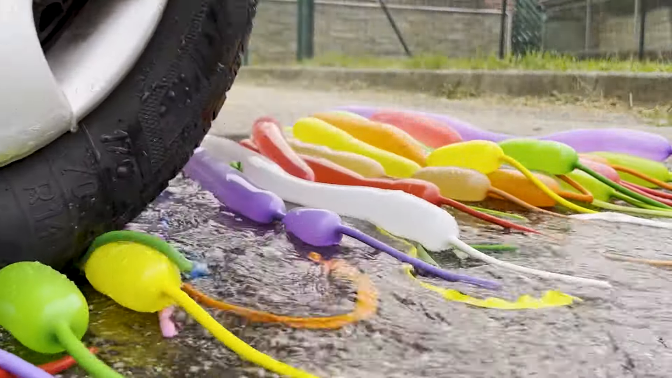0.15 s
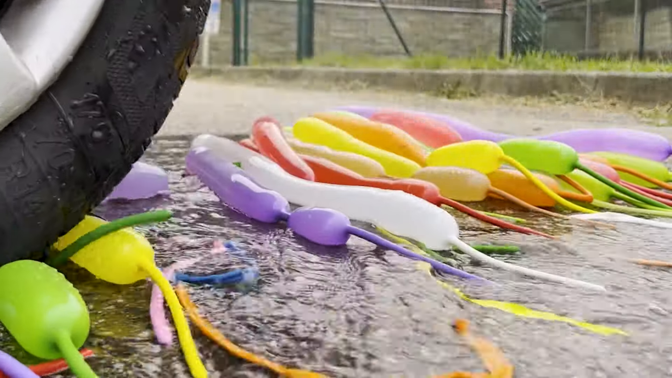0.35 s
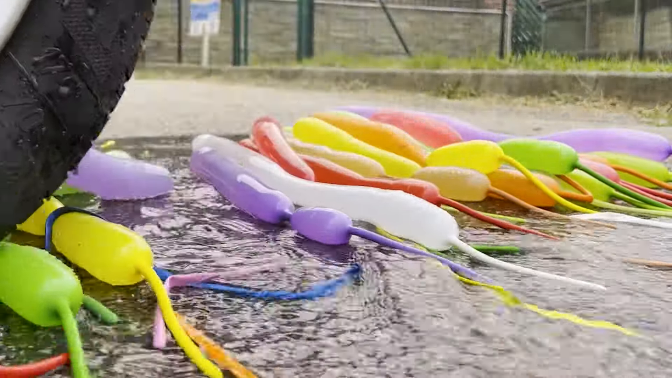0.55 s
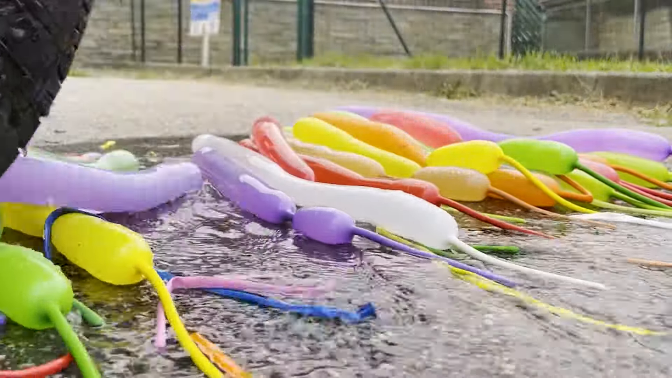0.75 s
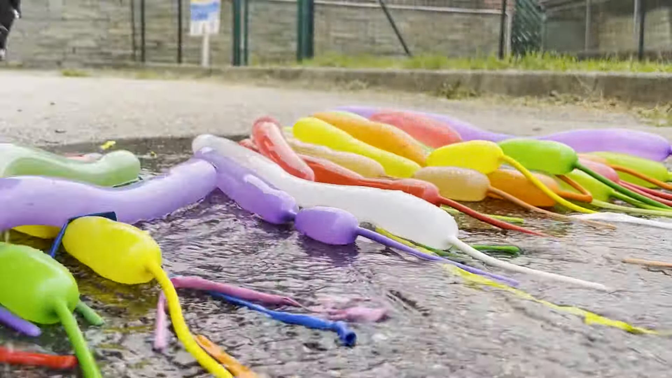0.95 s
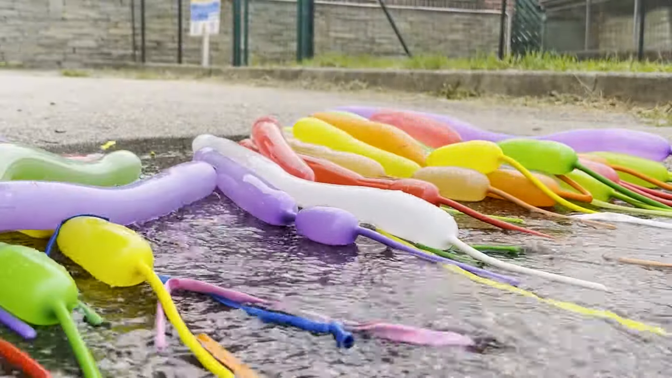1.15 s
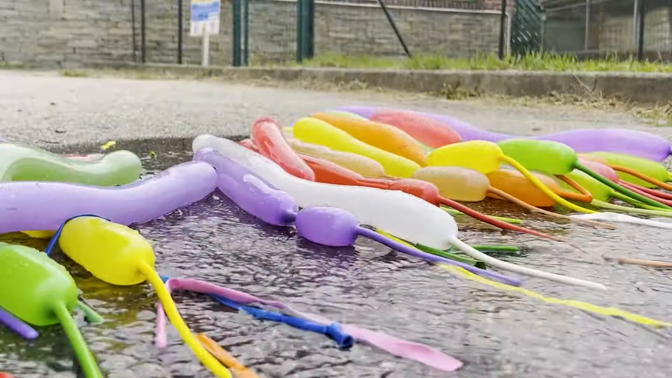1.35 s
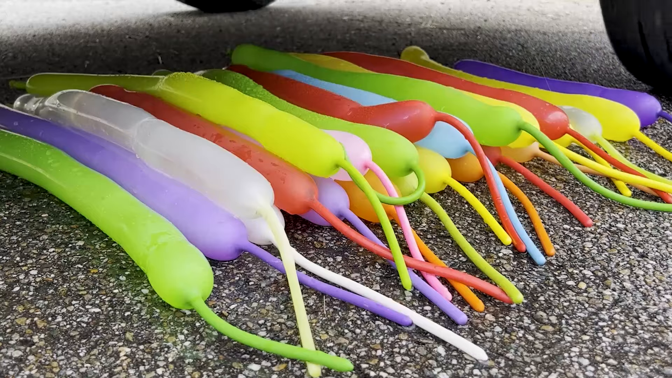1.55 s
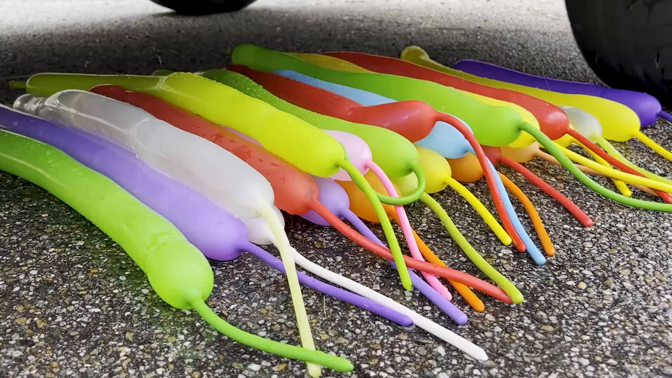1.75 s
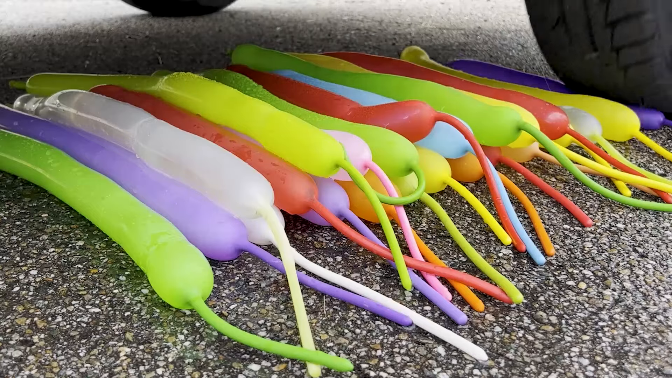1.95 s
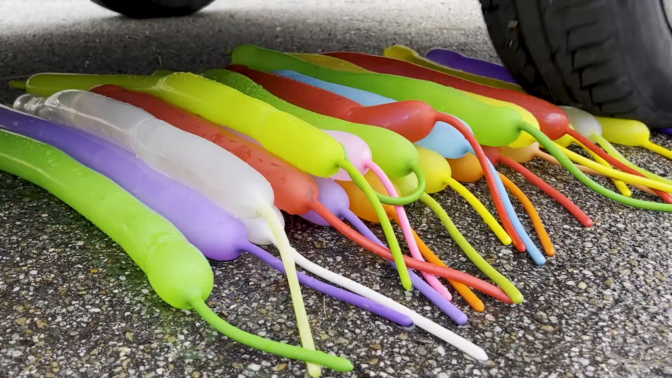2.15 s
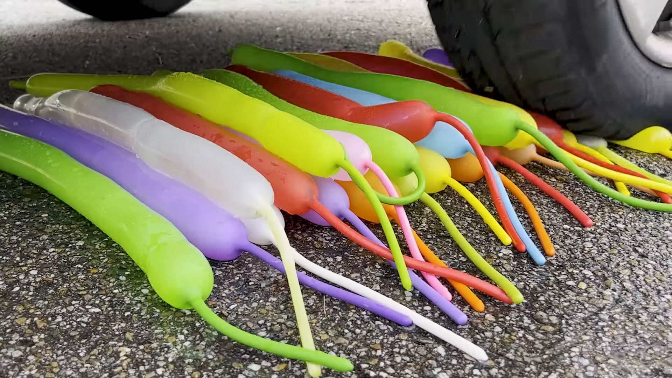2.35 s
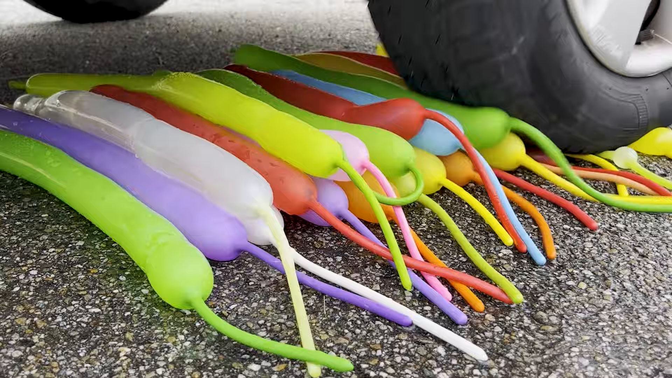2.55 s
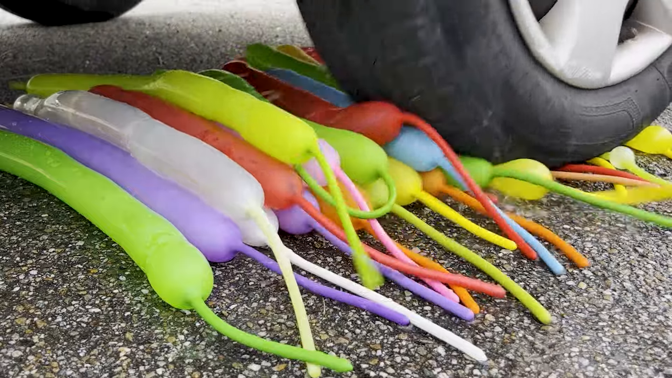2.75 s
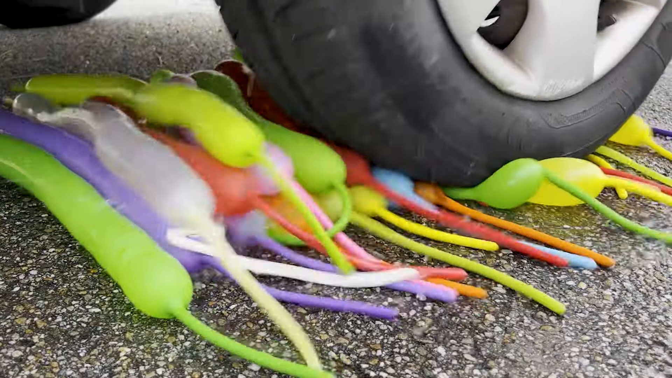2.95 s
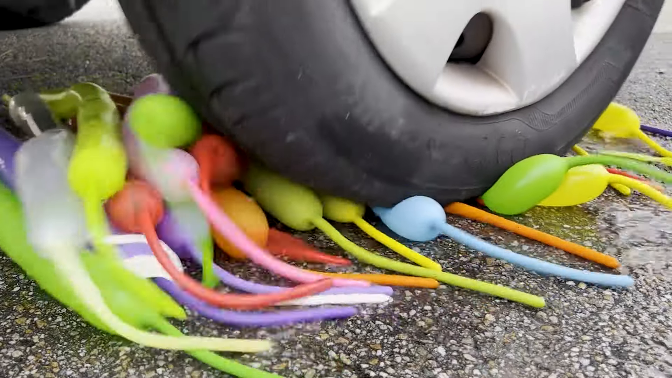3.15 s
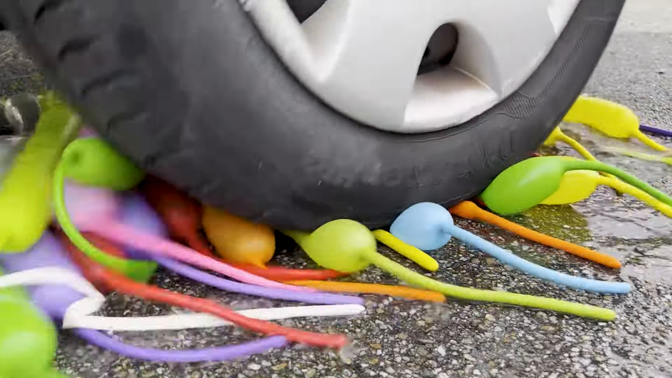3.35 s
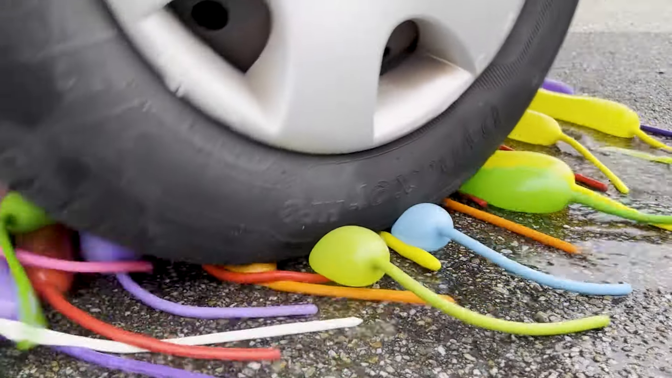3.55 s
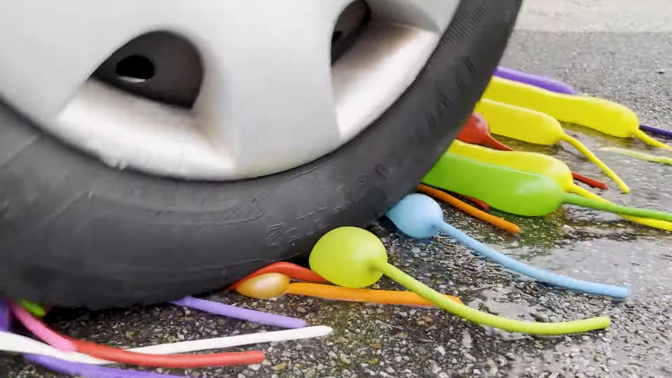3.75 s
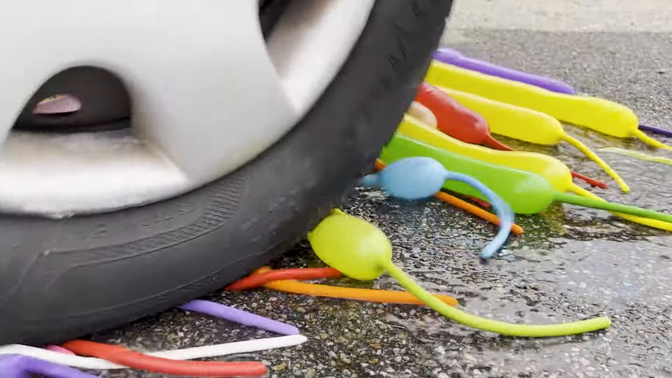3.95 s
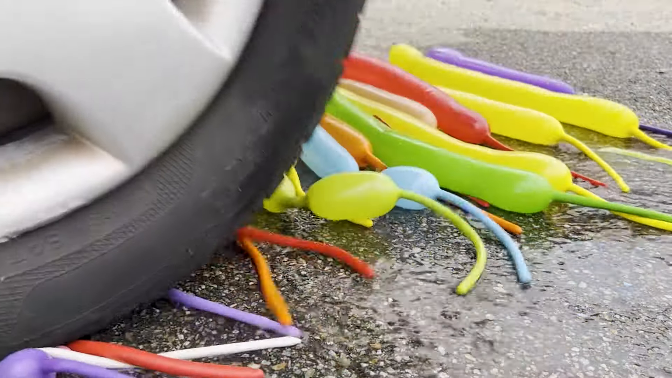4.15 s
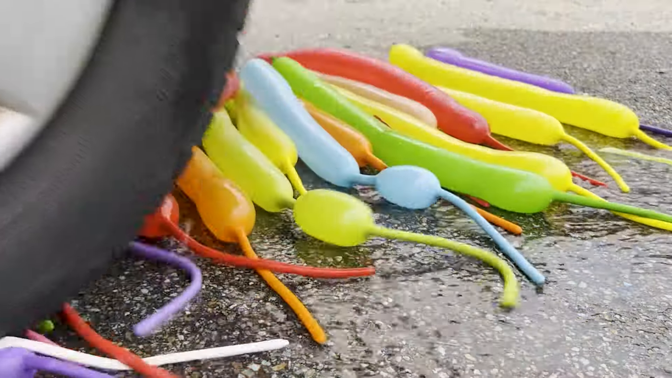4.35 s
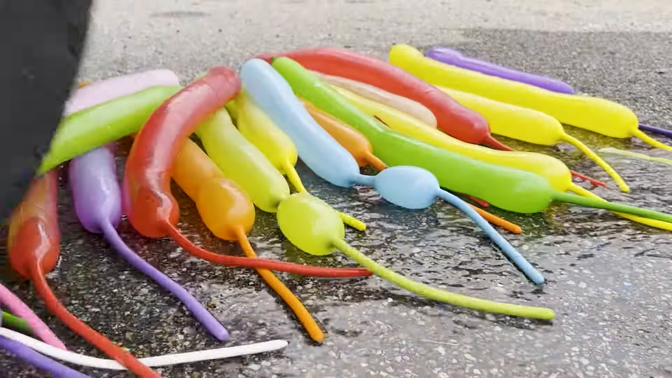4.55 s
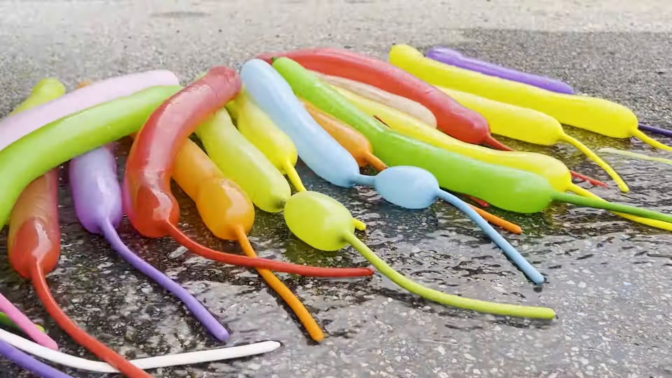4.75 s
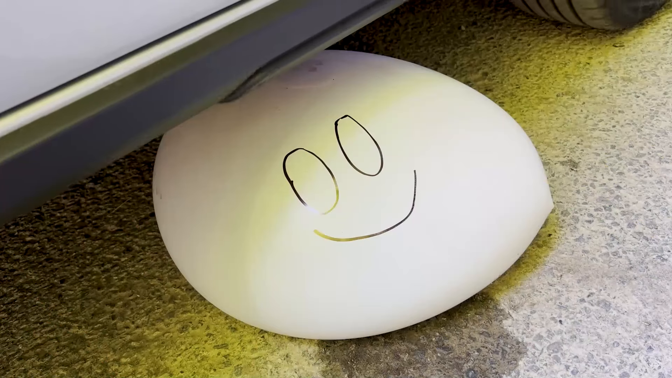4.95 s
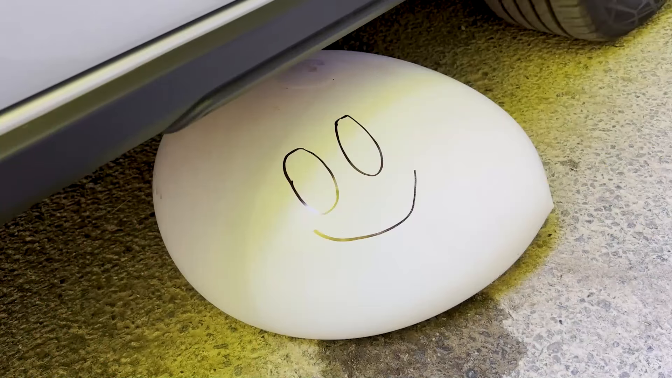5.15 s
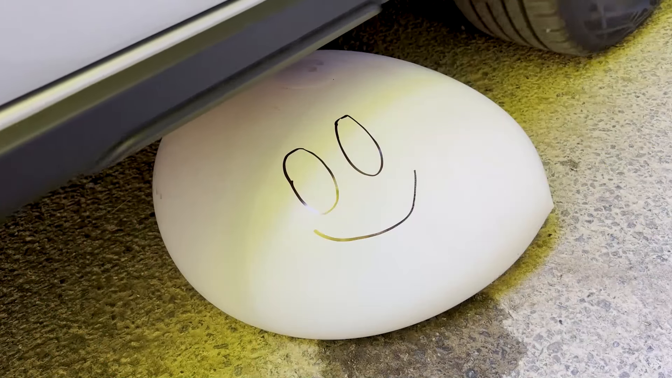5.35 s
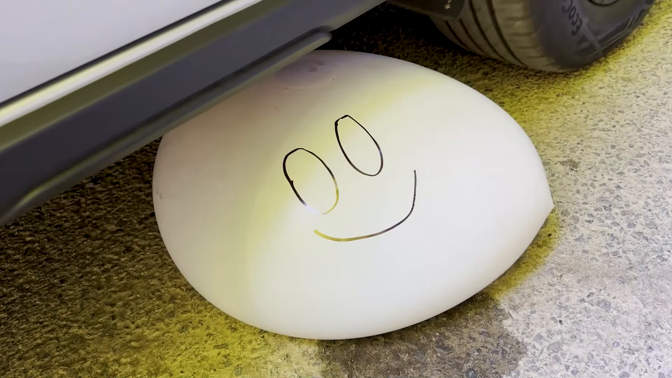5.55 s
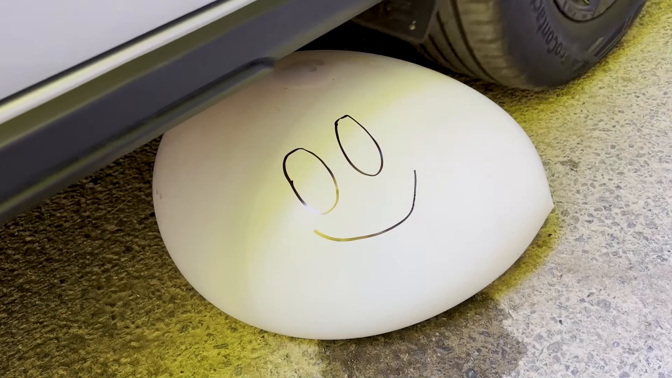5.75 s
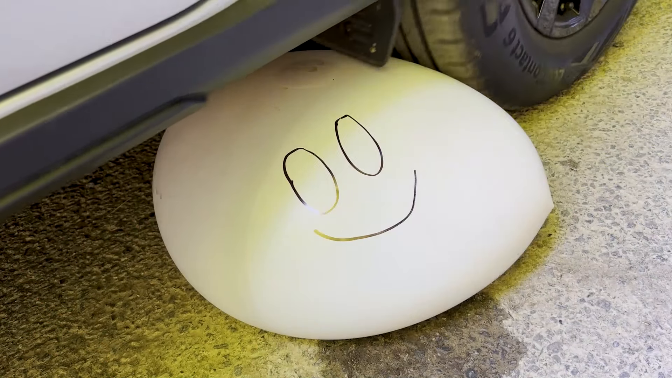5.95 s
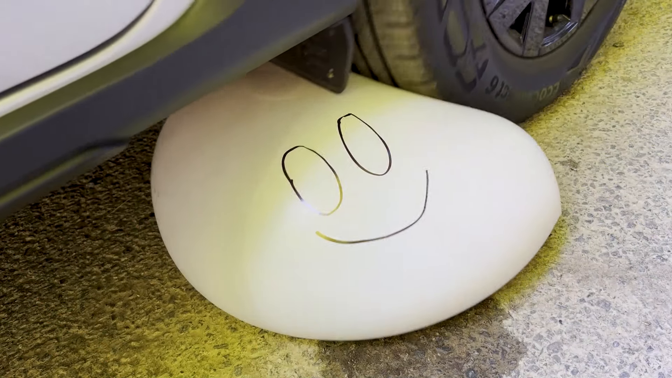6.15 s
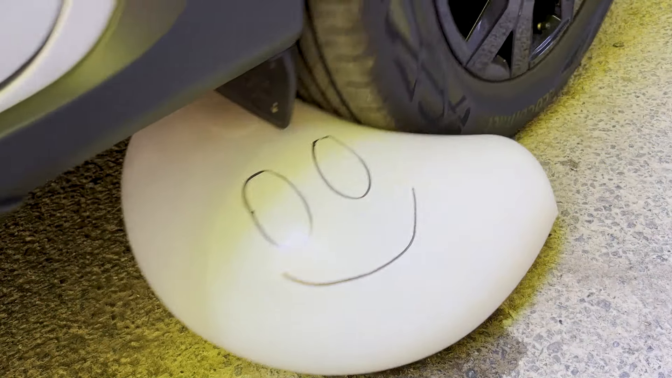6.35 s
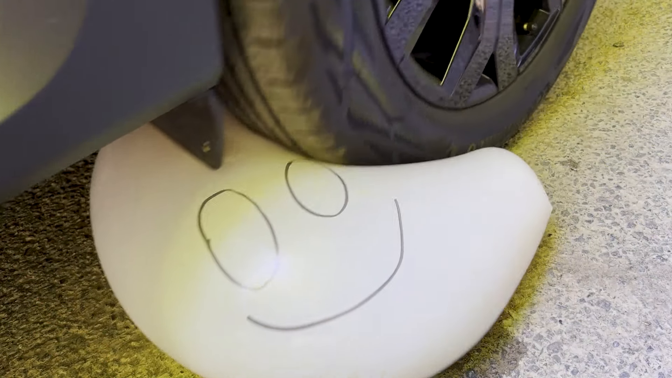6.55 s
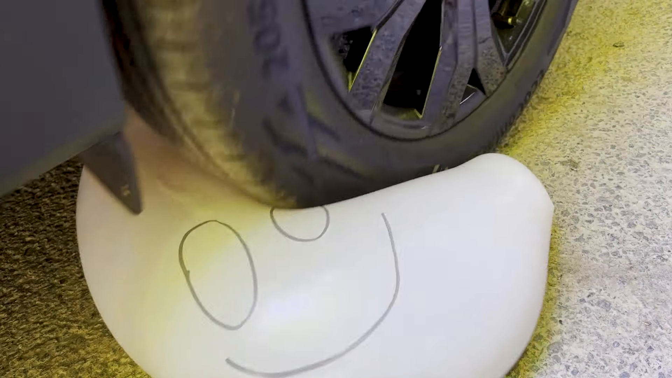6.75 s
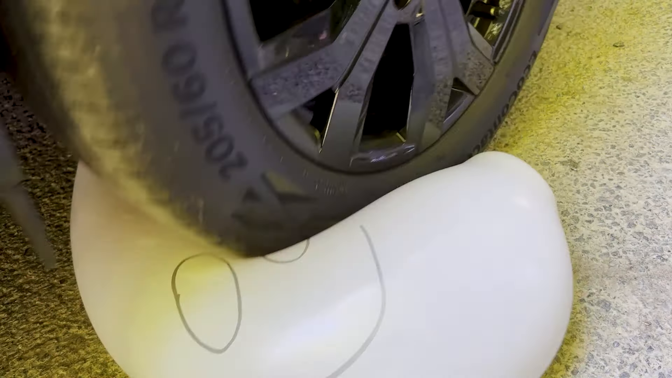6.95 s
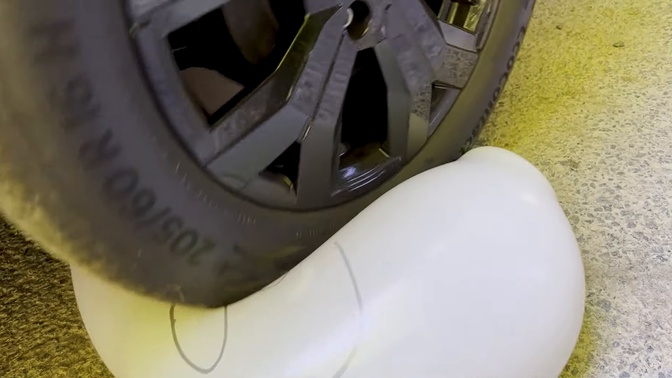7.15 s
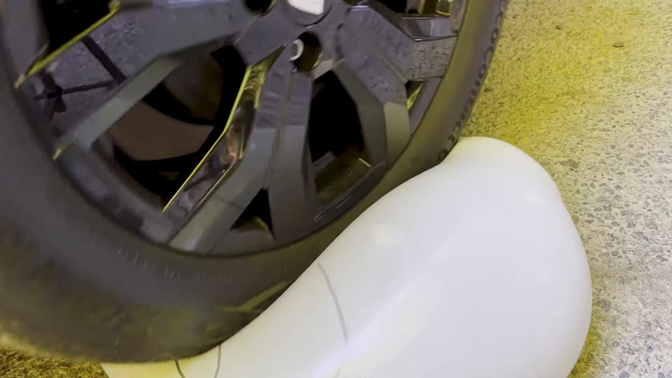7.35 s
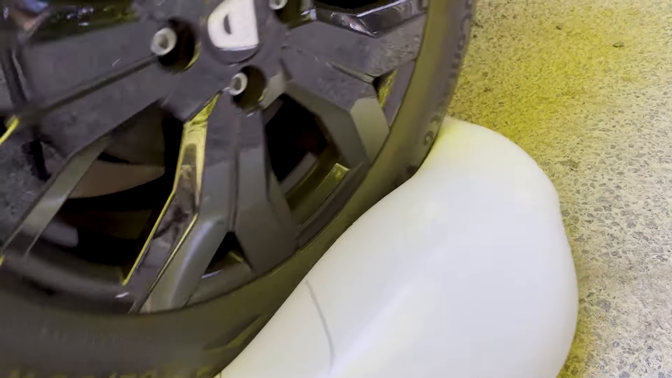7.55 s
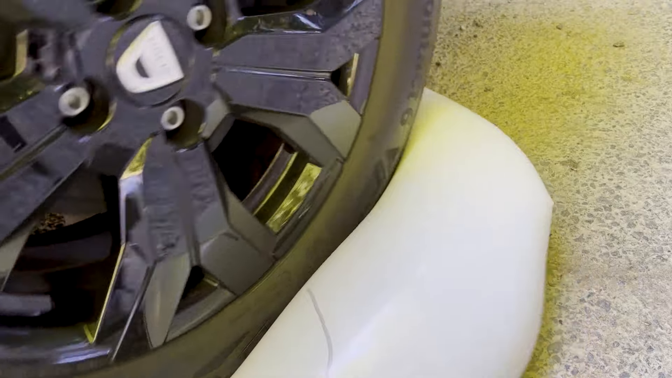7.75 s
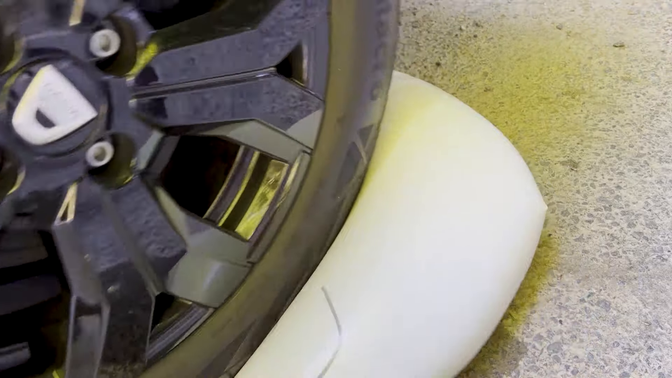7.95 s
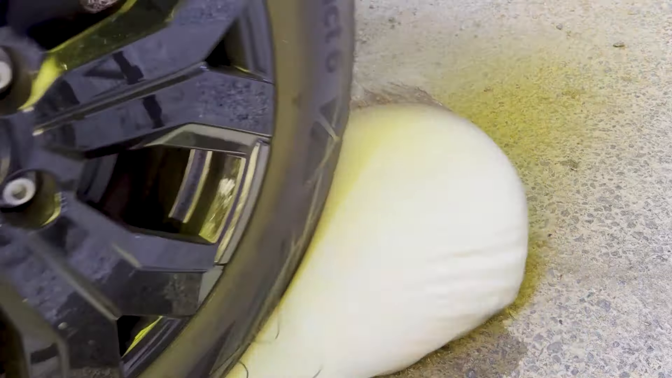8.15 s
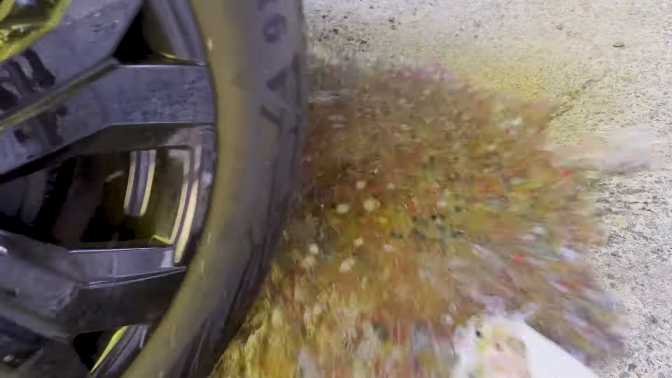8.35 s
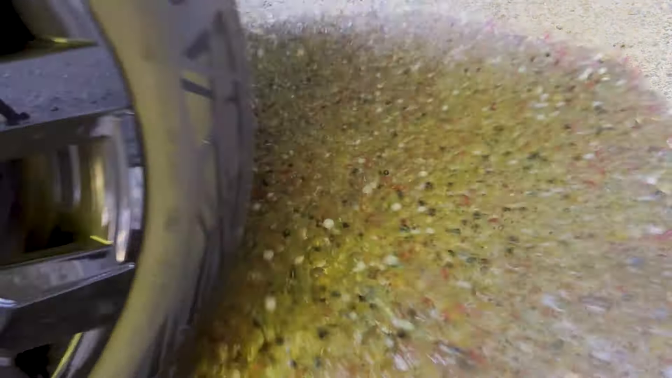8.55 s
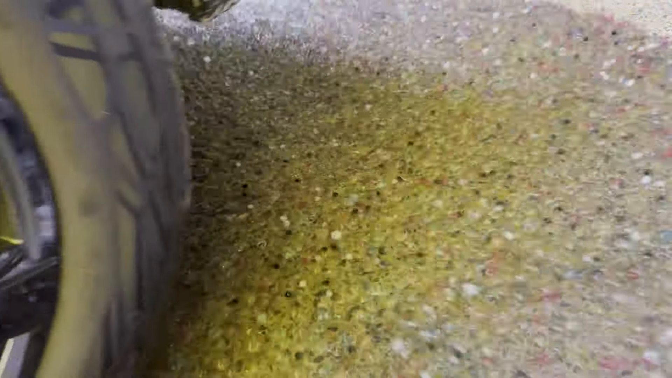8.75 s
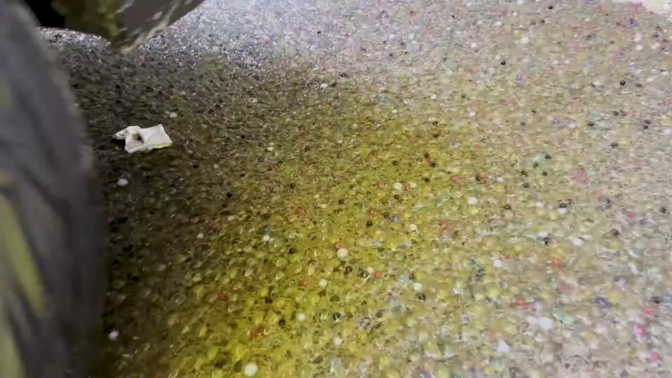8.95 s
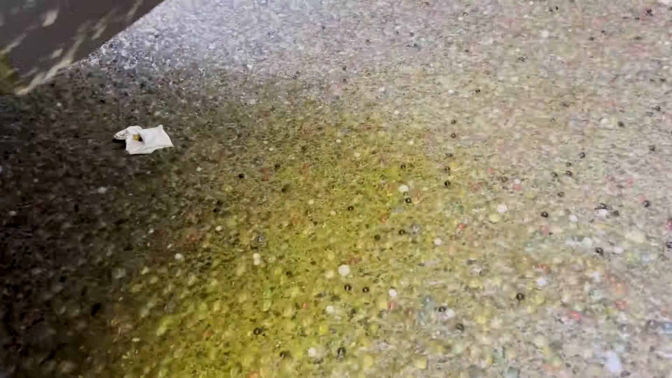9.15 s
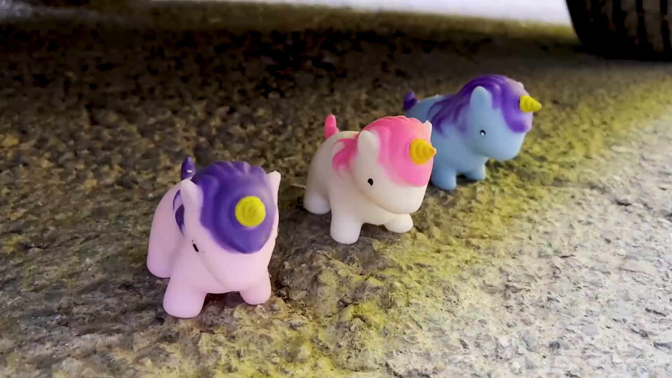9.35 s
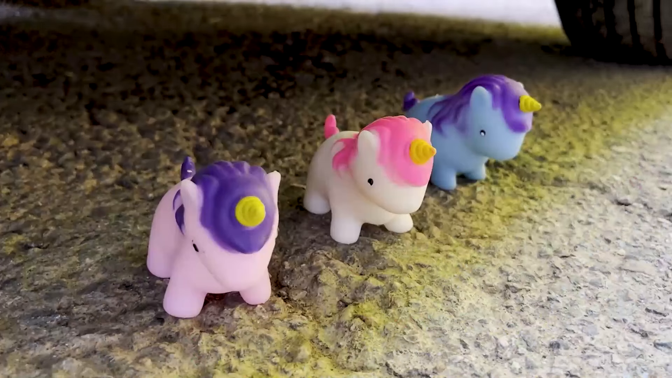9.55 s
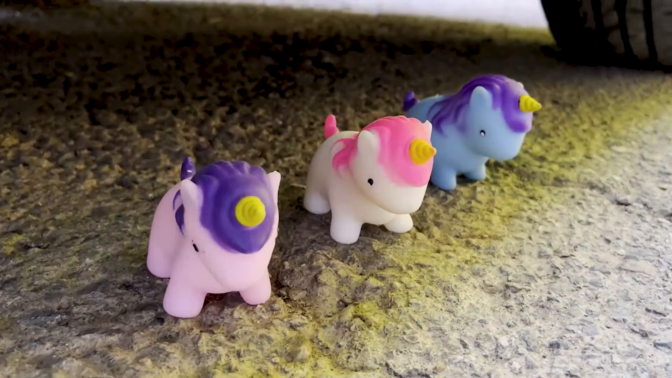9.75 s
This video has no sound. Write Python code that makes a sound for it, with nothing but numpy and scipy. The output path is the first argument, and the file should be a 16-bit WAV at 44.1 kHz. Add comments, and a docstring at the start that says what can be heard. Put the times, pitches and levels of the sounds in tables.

```python
"""Long water balloons burst, creak and snap under the tyre of a car that creeps over wet asphalt.
Ragged noise makes the bursts and gushes, and ringing slips make the rubber; firing tones make the idling engine.
A second, quieter car squeezes a big balloon full of gel beads until it tears open and they rain over the road.
Everything is heard close beside the tyre, in four passes that begin and end abruptly."""
import sys
import numpy as np
from scipy import signal
from scipy.fft import rfft, irfft, next_fast_len
from scipy.io import wavfile
from scipy.ndimage import uniform_filter1d

SR = 44100
rng = np.random.default_rng(int(sys.argv[2]) if len(sys.argv) > 2 else 0)


def dump(signal):
    """Clip the signal to [-1, 1] and save it as 16-bit WAV at the path in sys.argv[1]."""
    limited = np.clip(np.atleast_2d(signal).T, -1, 1)
    pcm = np.round(limited * 32767).astype(np.int16)
    wavfile.write(sys.argv[1], SR, pcm)


N = 431738
TIME = np.arange(N) / SR
# where the four passes begin and end [s]; the first car makes two, then the second car makes two
PASS_EDGES_S = (0, 1.44, 4.84, 9.4, 9.8)


def from_db(db):
    """Turn decibels into gain."""
    return np.exp(np.asarray(db) * (np.log(10) / 20))


def rms_one(x):
    """Scale to an average strength (rms) of 1."""
    return x / np.sqrt(np.mean(x ** 2) + 1e-20)


def in_time(rows):
    """Read each column of a curve at every sample."""
    s, *columns = np.transpose(rows)
    return [np.interp(TIME, s, column) for column in columns]


def at_hz(points, hz):
    """Read a table along log frequency."""
    f, value = np.transpose(points)
    return np.interp(np.log(hz + 1e-3), np.log(f), value)


def between(start, end):
    """Give 1 inside a stretch of time, with 8 ms fades."""
    return np.clip(np.minimum(TIME - start, end - TIME) / 0.008 + .5, 0, 1)


def drift(rate):
    """Wander at random: straight lines join `rate` chance values a second, which have spread 1."""
    knots = rng.standard_normal(int(rate * N / SR) + 2)
    return np.interp(TIME * rate, np.arange(len(knots)), knots)


def band(x, hz, kind):
    """Keep part of the spectrum with a Butterworth filter."""
    sos = signal.butter(2, np.clip(hz, 10, .45 * SR), kind, fs=SR, output="sos")
    return signal.sosfilt(sos, x)


def resonate(x, hz, width_hz):
    """Ring one resonance with gain 1 at its top."""
    r = np.exp(-np.pi * width_hz / SR)
    feedback = [1, -2 * r * np.cos(2 * np.pi * hz / SR), r * r]
    return signal.lfilter(np.array([1, 0, -1]) * (1 - r * r) / 2, feedback, x)


def gliding(slips, hz, width_hz):
    """Two unrelated trains of slips ring one resonance whose pitch may move; rms 1."""
    real, imaginary = band(slips, width_hz / 2, "low")
    angle = 2 * np.pi * np.cumsum(hz) / SR
    return rms_one(real * np.cos(angle) + imaginary * np.sin(angle))


def white():
    """Make two unrelated noises."""
    return rng.standard_normal((2, N))


def grains(per_s, spread_db):
    """Random tiny impacts of uneven strength, at the same moments on both sides; rms 1."""
    born = rng.random(N) < per_s / SR
    strength = from_db(spread_db * np.minimum(rng.exponential(1, N), 4))
    return rms_one(white() * born * strength)


def plips(per_s, low_hz, high_hz, sharpness, count=18):
    """Random wet drops ring briefly at one of `count` pitches; two sets that recur every few seconds."""
    size = N // 4 + 1
    drops = grains(per_s, spread_db=2.5)[:, :size]
    dealt = rng.integers(0, count, size)  # which pitch each drop gets
    pitches = np.geomspace(low_hz, min(high_hz, .4 * SR), count)
    rings = sum(resonate(drops * (dealt == k) + 1e-18, hz, hz / sharpness)
                for k, hz in enumerate(pitches))
    return np.tile(rms_one(rings), N // size + 1)[:, :N]


def coloured(pair, spectrum):
    """Give two unrelated signals a colour and make them left and right; rms 1."""
    # how alike left and right are: pitch_hz, likeness [1 = the same]
    likeness = [(50, 0.98), (260, 0.92), (500, 0.47), (2500, 0.65), (6000, 0.6), (9000, .85), (15000, 1)]
    # left minus right: pitch_hz, difference_db
    balance = [(100, 1.5), (250, 1.5), (700, 3), (2000, 3), (4500, 5.5), (8000, 1.5), (15000, -0.5)]
    size = next_fast_len(N)
    hz = np.arange(size // 2 + 1) * SR / size
    mid, side = rfft(pair, size) * from_db(at_hz(spectrum, hz))
    alike = np.clip(at_hz(likeness, hz), -1, 1)
    sides = np.array([[1], [-1]])
    both = np.sqrt(1 + alike) * mid + np.sqrt(1 - alike) * side * sides
    both = both * from_db(sides * at_hz(balance, hz) / 2)
    return rms_one(irfft(both, size)[:, :N])


def add(out, s, sound):
    """Mix a sound in at a time."""
    at = int(s * SR)
    out[:, at:at + sound.shape[-1]] += sound[..., :N - at]


def bursts():
    """The skin rips: bass from the escaping volume, treble from the torn edge, a cavity ring, then gushes."""
    # balloons tear or let go: start_s, level_db, tearing_s, bass_db, treble_db, ring_hz, ring_db
    tears = [(0.9355, -16, 0.0095, 11, 13.5, 564, -1.5), (1.402, -26, 0.0057, 7.5, 6, 550, -4),
             (2.586, -3, 0.0047, -42, 0.5, 1760, -6), (2.996, -15, 0.011, 2.5, 8, 3370, 5),
             (3.697, -21.5, 0.0022, -9, 7.5, 1470, 0.5), (3.921, -22, 0.0075, -9, -3, 1380, 0),
             (6.966, -29, 0.032, -9.5, 14.5, 1640, 0), (6.98, -30.5, 0.044, 14, 9.5, 644.4, 10),
             (8.108, -16, 0.0093, 7, 15, 980, -9), (8.12, -16.5, 0.03, 6, 14, 990, -0.5)]
    # water or a clump of beads slaps the road: start_s, level_db, rise_s, t60_s, treble_db, ring_hz, ring_db
    slaps = [(0.998, -20.5, 0.019, 0.087, -0.5, 748, -5), (2.595, -11, 0.0043, 0.25, -9.5, 1345, -4.5),
             (2.866, -18.5, 0.0042, 0.15, -2, 877, -9), (8.197, -16.5, 0.0039, 0.14, -22, 1340, -1.5),
             (8.267, -16, 0.02, 0.17, 6, 1140, -5), (8.321, -21.5, 0.005, 0.029, 0, 1823, 9.5),
             (8.401, -16.5, 0.022, 0.14, 4, 1000, -5), (8.571, -27.5, 0.0031, 0.14, 11.5, 480, 4.5)]
    # colour of the rush: pitch_hz, level_db
    colour_curve = [(59, -26), (100, -3.5), (621, -8), (1230, -4), (1480, -5), (1830, -6), (7290, -14),
                    (8640, -10.5), (10200, -15.5), (11600, -14.5), (16000, -19.5)]
    rise_share = 0.66  # of the tearing time; the rest is held
    tear_t60_s, t60_per_tear = 0.042, 3.5  # a longer tear dies away more slowly
    gush_hold_s, gush_bass_db = 0.012, -15
    rush = coloured(white() + 0.94 * grains(per_s=3000, spread_db=-1.5), colour_curve)
    rush = rush * from_db(2.3 * drift(250))  # ragged
    bass = band(rush, 550, "low")
    body = -band(rush, [450, 3200], "band")
    treble = band(rush, 4700, "high")
    churn = coloured(white(), colour_curve)
    out, t = np.zeros((2, N)), TIME[:SR // 2]

    def blast(s, rise, hold, t60, bass_db, treble_db, ring_hz, ring_db):
        """One rush rises, holds and dies; its bass, treble and ring are set against its middle."""
        span = slice(int(s * SR), int(s * SR) + len(t))
        fall_db = -60 * np.maximum(t - rise - hold, 0) / t60
        shape = np.minimum(t / max(rise, 1e-4), 1) * from_db(fall_db)
        cavity = rms_one(resonate(churn[:, span], ring_hz, ring_hz / 5))
        edges = from_db(bass_db) * bass[:, span] + from_db(treble_db) * treble[:, span]
        return shape * (body[:, span] + edges + from_db(ring_db) * cavity)

    for s, db, tear, *colour in tears:
        rise, hold = rise_share * tear, (1 - rise_share) * tear
        add(out, s, from_db(db) * blast(s, rise, hold, tear_t60_s + t60_per_tear * tear, *colour))
    for s, db, rise, t60, *colour in slaps:
        add(out, s, from_db(db) * blast(s, rise, gush_hold_s, t60, gush_bass_db, *colour))
    return out


def beads():
    """Gel beads pour down steadily, then thin out: fine patter, lone ticks, and clumps with wet plops."""
    # colour of the pouring beads: pitch_hz, level_db
    bead_colour = [(210, -36.5), (350, -15), (490, 1), (575, -8.5), (1010, -1), (1450, -5.5), (2200, -3),
                   (8310, -3), (10100, -3), (11600, -5.5), (13900, -5.5), (16000, -2)]
    start_s, thins_s, rise_s = 8.17, 8.754, 0.025
    # the wet splatter fades faster than the fine patter
    splatter_start_db, splatter_fall_db_per_s = -16, 49.5
    patter_start_db, patter_fall_db_per_s = -23, 29
    clump_db, clumps_per_s = 1.7, 33  # the beads land unevenly
    thinning_s = np.maximum(TIME - thins_s, 0)
    splatter_db = splatter_start_db - splatter_fall_db_per_s * thinning_s
    patter_db = patter_start_db - patter_fall_db_per_s * thinning_s
    single = plips(per_s=4500, low_hz=1500, high_hz=13000, sharpness=12)
    clumps = plips(per_s=1000, low_hz=450, high_hz=3000, sharpness=10)
    lone = plips(per_s=200, low_hz=1000, high_hz=7500, sharpness=6)
    hiss = .6 * white() + .5 * grains(per_s=1800, spread_db=2.5)
    rain = coloured(hiss + single + .3 * clumps + .42 * lone, bead_colour)
    splatter = from_db(splatter_db) * band(rain, 2310, "low")
    patter = from_db(patter_db) * band(rain, 4400, "high")
    onset = np.clip((TIME - start_s) / rise_s, 0, 1)
    unevenness = from_db(clump_db * drift(clumps_per_s))
    return (splatter - patter) * onset * unevenness * between(-1, 9.4)


def bead_ticks():
    """A near bead lands with a tiny ring that rises a little in pitch."""
    # single beads that land close by: start_s, level_db, pitch_hz
    near_beads = [(8.638, -7, 6200), (8.718, -15, 1140), (8.73, -13, 2370), (8.762, -3, 8600),
                  (8.871, -16.5, 1690), (8.914, -21.5, 1040)]
    out, t = np.zeros((2, N)), TIME[:SR // 10]
    for s, db, hz in near_beads:
        age = t * hz / 37  # reaches 1, 60 dB down, after 37 cycles
        tone = np.sin(2 * np.pi * hz * t * (1 + 0.044 * age))
        add(out, s, from_db(db - 60 * age) * np.minimum(t * hz, 1) * tone)
    return out


def rubber():
    """Bright snaps and dull knocks as the balloons are pinched and let go."""
    # rubber snaps off the tread: start_s, level_db (of the loudest 5 ms), pitch_hz
    snap_list = [(0.382, -22.5, 3520), (0.383, -24, 9350), (0.533, -34.5, 3930), (0.876, -17, 4900),
                 (0.933, -15, 5400), (0.965, -19, 8000), (1.0073, -18.5, 5000), (1.02, -19, 8700),
                 (1.1, -32, 3030), (1.228, -16.5, 1960), (1.2427, -8, 2310), (1.243, -14.5, 4600),
                 (1.276, -23, 2900), (1.326, -28, 7450), (1.3325, -18.5, 3260), (1.3535, -22.5, 7800),
                 (1.366, -22, 2460), (1.4055, -18, 6160), (1.491, -31.5, 3830), (1.553, -36.5, 1980),
                 (2.858, -1.5, 7200), (2.977, -22, 3834), (3.459, -36, 9200), (3.699, -17, 3370),
                 (3.702, -19, 1410), (3.719, -29, 3500), (3.9277, -9.5, 1340), (4.038, -35.5, 6900),
                 (5.917, -36, 1820), (5.997, -19.5, 8060), (6.023, -20, 12000), (6.085, -20.5, 8200),
                 (6.111, -25, 8700), (6.379, -42, 2600), (8.147, -7, 7200), (8.159, 0, 2100),
                 (8.2353, -12, 6160)]
    # squeezed rubber knocks: start_s, level_db (of the loudest 5 ms), pitch_hz, t60_s of its slips
    knock_list = [(5.0954, -27, 920, 0.014), (5.098, -32, 597, 0.06), (5.239, -35, 690, 0.084),
                  (5.313, -41.5, 800, 0.05), (5.352, -36, 1880, 0.06), (5.355, -35.5, 450, 0.06),
                  (6.565, -39.5, 574, 0.06), (6.748, -42, 900, .03), (6.857, -27.5, 454, 0.05),
                  (6.857, -33.5, 1420, 0.037), (6.998, -15, 343, 0.11), (7.641, -24.5, 410, 0.04),
                  (7.75, -28, 980, 0.05), (7.8425, -23, 740, 0.014), (7.872, -27.5, 480, .04),
                  (9.119, -31, 2100, .04), (9.395, -34.5, 1300, .025), (9.473, -30, 1500, 0.03),
                  (9.596, -31, 1380, 0.068)]
    out = np.zeros((2, N))
    for s, db, hz in snap_list:
        add(out, s, from_db(db) * snap(hz))
    for s, db, hz, t60 in knock_list:
        add(out, s, from_db(db) * knock(hz, t60))
    return out * from_db([[.7], [-.7]])  # a little to the left


def snap(hz):
    """A bright, very short slip: lower ones are purer squeaks, higher ones have more crack."""
    crack = 0.35 * np.sqrt(hz / 6000)
    return strike(hz, t60=.010, sharpness=2.6, crack=crack, low_hz=1500, spread=0.87)


def knock(hz, t60):
    """A dull slip of stretched rubber, damped more strongly than a snap."""
    return strike(hz, t60, sharpness=1.0, crack=0.18, low_hz=131, spread=0.6)


def strike(hz, t60, sharpness, crack, low_hz, spread):
    """A short rattle of slips rings one damped resonance of stretched skin; its loudest 5 ms have rms 1."""
    t = TIME[:SR // 4]
    mid, side = rng.standard_normal((2, len(t)))
    shape = np.minimum(t / 0.0004, 1) * from_db(-60 * t / max(t60, .003))
    slips = (mid + spread * side * [[1], [-1]]) * shape
    ring = resonate(resonate(slips, hz, hz / sharpness), hz, hz / sharpness)  # twice: dark on both sides
    noise = rms_one(band(slips, [low_hz, 2 * hz + low_hz], "band"))
    sound = rms_one(ring) + crack * noise
    return sound / np.sqrt(uniform_filter1d(np.mean(sound ** 2, axis=0), size=SR // 200).max())


def judder():
    """The big balloon judders under the tread: each slip rasps into the same modes of its taut skin."""
    # a short run of slips: start_s, level_db
    slip_list = [(6.112, -24.5), (6.126, -20.5), (6.149, -24), (6.163, -20), (6.179, -20.5)]
    # modes of the skin: pitch_hz, width_hz (doubled below), level_db
    skin_modes = [(280, 24, -4), (381, 23, -9), (1015, 92, -4), (1340, 100, -14), (2000, 140, -8),
                  (2940, 250, -2), (3220, 280, -4), (3800, 150, -2.5), (8500, 1100, 1.5),
                  (12000, 2800, 4.5)]
    out, t = np.zeros((2, N)), TIME[:SR // 4]
    for s, db in slip_list:
        rasp = rng.standard_normal(len(t)) * from_db(-60 * t / 0.016)  # 60 dB down after 16 ms
        skin = np.zeros(len(t))
        for hz, width_hz, mode_db in skin_modes:
            ring = resonate(resonate(rasp, hz, 2 * width_hz), hz, 2 * width_hz)
            skin += from_db(mode_db) * ring / np.abs(ring).max()
        add(out, s, from_db(db) * skin)
    return out


def groan():
    """Stick and slip rings the resonances of the squeezed balloon, which sink together as it bulges."""
    # the tread drags over the big balloon: time_s, pitch_hz, level_db
    drag = [(7.06, 700, -46.5), (7.22, 669.7, -45), (7.35, 544.6, -42.5), (7.85, 531, -40.5),
            (8.1, 480.6, -45)]
    # resonances, the highest a broad rubbing hiss: multiple of the pitch, width_hz, level_db
    groan_modes = [(.72, 130, -1), (1, 45, -1), (2.17, 220, -6), (8.2, 2180, -4)]
    slips_per_s = 130
    hz, db = in_time(drag)
    ring = np.zeros((2, N))
    for multiple, width_hz, mode_db in groan_modes:
        slips = grains(slips_per_s, spread_db=3.0)
        ring += from_db(mode_db) * gliding(slips, multiple * hz, width_hz)
    return from_db(db) * between(drag[0][0], drag[-1][0]) * ring


def squelches():
    """Ragged slips ring a pocket of water and air whose pitch may glide as it is squeezed."""
    # wet rubber squeezes out water: start_s, level_db, length_s, centre pitch_hz, glide_octaves
    squeezes = [(1.124, -38, 0.024, 1850, -0.17), (2.773, -36.5, 0.053, 2200, .2),
                (3.235, -42.5, 0.04, 2045, -.3), (3.623, -38.5, 0.056, 1020, 0),
                (3.773, -42.5, 0.034, 2300, -0.49), (4.518, -41, 0.033, 2686, 0.235),
                (6.042, -42, 0.067, 1042, 0), (8.306, -24, 0.045, 902, 1.42)]
    sharpness = 2.6  # pitch divided by width
    out = np.zeros((2, N))
    slips = white() + grains(per_s=500, spread_db=2.0)
    for s, db, length, hz, octaves in squeezes:
        age = np.linspace(0, 1, int(max(length, .005) * SR))
        span = slice(int(s * SR), int(s * SR) + len(age))
        pitch = hz * 2 ** (octaves * (age - .5))
        ring = gliding(slips[:, span], pitch, hz / sharpness)
        add(out, s, from_db(db) * np.sin(np.pi * age) * ring)
    return out * from_db([[1], [-1]])  # a little to the left


def tyre():
    """Rolling rubber: a low rumble, tread scrubbing and squelching on stone, and crackling grit."""
    # rumble of the first car and of the second car: pitch_hz, level_db
    first_rumble, second_rumble = [(88, -23.5), (150, 3), (167, -18.5), (205, -9), (500, -15), (650, -36.5),
                                   (1100, -120)], [(15, -45), (25, -13), (64, 5), (102, -2), (134, -1),
                                                      (227, -6), (257, -2), (379, -15.5), (500, -44),
                                                      (1100, -120)]
    # colour of the scrubbing tread: pitch_hz, level_db
    scrub_colour = [(210, -27), (350, 0), (535, -6.5), (595, -5), (972, -4.5), (1220, -7.5), (1500, -6.5),
                    (3500, -16.5), (4550, -34.5), (7700, -120)]
    # grit on the wet road and on the dry road: pitch_hz, level_db
    wet_grit, dry_grit = [(1650, -18.5), (2800, 0.5), (5500, -3), (8480, -1), (10200, -7.5), (11800, -8),
                          (13800, -13.5), (16000, -10.5)], [(2000, -7.5), (3300, 2), (6000, 4), (8500, 6), (15500, -2.5)]
    catch_size_db, catches_per_s = 3, 65  # the tread catches and slips
    creak_size_db, creaks_per_s = 1.33, 34  # slower surges of the scrubbing
    rumble_gain, scrub_gain, grit_gain = contact()
    first_car, dry_road = between(-1, 4.84), between(4.84, 6.3)
    rumble = first_car * coloured(white(), first_rumble)
    rumble = rumble + (1 - first_car) * coloured(white(), second_rumble)
    wet_drops = plips(per_s=1000, low_hz=450, high_hz=4000, sharpness=14)
    scrub = coloured(white() + (.25 + .15 * first_car) * wet_drops, scrub_colour)
    stray_ticks = grains(per_s=16, spread_db=1.0)
    crackle = white() + .5 * grains(per_s=490, spread_db=5.0) + 0.15 * stray_ticks
    grit = (1 - dry_road) * coloured(crackle, wet_grit) + dry_road * coloured(crackle, dry_grit)
    catch_db = catch_size_db * drift(catches_per_s)
    creak_db = creak_size_db * drift(creaks_per_s)
    rubbing = scrub_gain * from_db(.5 * catch_db + creak_db) * scrub
    return rumble_gain * lull() * rumble + rubbing + grit_gain * from_db(catch_db) * grit


def contact():
    """Gains of rumble, scrub and grit: steady rolling, plus rubs that set in, swell or ease, and let go."""
    # free rolling, a row for each pass: rumble_db, scrub_db, grit_db
    rolling = [(-45, -48, -56), (-49.5, -53.5, -61.5), (-47.5, -53.5, -57.5), (-44.5, -43.5, -47)]
    # the tread grips and rubs over something: start_s, length_s, swell_db, rumble_db, scrub_db, grit_db
    rubs = [(0, 0.42, 6.5, -63, -51.5, -57), (0.849, 0.45, -5.5, -36.5, -38, -43),
            (1.322, 0.11, 11, -38, -36, -33.5), (1.431, 0.16, -3, -42, -45, -53.5),
            (2.351, 0.26, 17, -72, -49.5, -55), (2.583, 0.44, 6.5, -37, -33.5, -42),
            (3.08, 0.53, 1.5, -46.5, -43, -50), (3.663, 0.024, 3, -37, -37, -39.5),
            (3.902, 0.027, 1.5, -35.5, -33.5, -42), (3.988, 0.23, -2, -60.5, -53.5, -59),
            (4.832, 0.27, -18, -75, -82, -56.5), (5.13, 0.26, 10, -45, -54, -59),
            (5.878, 0.12, 0, -43, -48.5, -42.5), (5.979, 0.073, 3, -50, -44.5, -30.5),
            (6.067, 0.12, 5.5, -31.5, -36.5, -38), (6.52, 0.27, 12, -44.5, -53, -57.5),
            (6.82, 0.17, -1.5, -46, -40.5, -45.5), (6.968, 1.27, 2, -40.5, -37.5, -44.5),
            (7.226, 0.2, 3, -35, -48.5, -46.5), (8.126, 0.17, -28.5, -28.5, -22.5, -41),
            (8.304, 0.93, -4.5, -37, -42.5, -42)]
    attack_s, t60_s = 0.0088, 0.16
    t = TIME[::64]  # coarse steps are enough for gains
    power = np.zeros((3, len(t)))
    for start, end, db in zip(PASS_EDGES_S, PASS_EDGES_S[1:], rolling):
        power += np.outer(from_db(db), (t >= start) & (t < end)) ** 2
    for start, length, swell_db, *db in rubs:
        age = t - start
        swell = swell_db * (np.clip(age / length, 0, 1) - .5)
        shape_db = swell - 60 * np.maximum(age - length, 0) / t60_s
        in_pass = t < min(edge for edge in PASS_EDGES_S if edge > start + length / 2)
        shape = np.clip(age / attack_s, 0, 1) * from_db(shape_db) * in_pass
        power += np.outer(from_db(db), shape) ** 2
    return [np.interp(TIME, t, np.sqrt(p)) for p in power]


def thuds():
    """A soft push sets off a rough low boom whose pitch moves to a resting pitch as the load eases."""
    # thuds under the car: start_s, level_db, starting pitch_hz, t60_s
    pushes = [(5.175, -35, 280, 0.0705), (5.354, -32.5, 301, .2), (5.883, -29, 130, .08),
              (6.119, -29, 80, .22), (7.262, -25, 150.6, .2), (7.338, -24, 158.6, 0.16),
              (8.226, -24, 119.7, 0.26), (9.419, -30, 260, 0.25), (9.597, -28, 288, .25)]
    rise_s, sink_s, end_hz = 0.0035, .013, 74.8
    out, t = np.zeros((2, N)), TIME[:SR // 3]
    for s, db, start_hz, t60 in pushes:
        hz = end_hz + (start_hz - end_hz) * np.exp(-t / sink_s)
        boom = gliding(rng.standard_normal((2, len(t))), hz, .7 * start_hz)
        add(out, s, from_db(db - 60 * t / t60) * np.minimum(t / rise_s, 1) * boom)
    return out


def engines():
    """The idling car in two passes, then the soft wavering drone of the second car under load."""
    # exhaust loudness in the first and second pass: time_s, level_db
    first_level, second_level = [(0, -43.5), (.8, -41), (.92, -32.5), (1.42, -34)], [(1.44, -27.5), (1.8, -32), (2.9, -30), (3.2, -26),
                                                 (3.66, -24.5), (3.74, -32), (3.89, -32), (3.97, -27),
                                                 (4.84, -23.5)]
    # exhaust tones in the two passes: multiple of the crankshaft rate, level_db
    first_orders, second_orders = [(1, -5), (2, 2), (3, -9), (4, -2.5), (5, 0), (6, -22.5), (7, -15.5),
                                   (8, -14)], [(1, -25), (2, 2), (3, -14.5), (4, -24), (5, -16),
                                                     (6, -27)]
    # rings of pipes and panels in the two passes: pitch_hz, width_hz, level_db
    first_rings, second_rings = [(211.6, 5.5, -60), (243, 10, -60.5), (369, 4.9, -55.5)], [(86.1, 6, -47), (231.3, 24, -59.5), (338.9, 9, -57.5),
                                                  (428.6, 29, -61.5)]
    # firing rate in the second pass: time_s, rate_hz
    firing = [(1.5, 50.47), (3.56, 50.2), (3.73, 49.15), (4.8, 50.7)]
    # the volume of the engine is turned up abruptly around some of the bursts: start_s, end_s, boost_db
    boosts = [(2.598, 3.044, 11.5), (3.682, 3.723, 12.5), (3.909, 3.946, 14)]
    # drone of the second car: time_s, pitch_hz, level_db
    drone_curve = [(4.85, 92, -45.5), (5.7, 84, -44), (6.1, 68, -39), (7.8, 74, -41), (9.3, 77, -48),
                   (9.45, 52.5, -37), (9.79, 51.6, -34.5)]
    boost_db = sum(db * between(start, end) for start, end, db in boosts)
    firing_hz, = in_time(firing)
    first = idle(26.4, first_level, first_orders, rough=0.23) + hum(first_rings)
    first = first * between(-1, 1.44)
    second = idle(firing_hz / 2, second_level, second_orders, rough=.32) + hum(second_rings)
    second = second * between(1.44, 4.84) * from_db(boost_db)
    hz, db = in_time(drone_curve)
    drone = from_db(db) * np.sin(2 * np.pi * np.cumsum(hz * (1 + 0.063 * drift(25))) / SR)
    drone = drone * between(5.8, 11) * lull()
    return (first + second + drone) * from_db([[.3], [-.3]])


def idle(crank_hz, level, orders, rough):
    """Four cylinders fire twice a turn; uneven firing makes the other tones waver more than the second."""
    size = N // 2  # this car is heard in the first half only
    level_db, = in_time(level)
    angle = 2 * np.pi * np.cumsum(crank_hz * (1 + .004 * drift(10)))[:size] / SR
    out = np.zeros(N)
    for order, db in orders:
        unevenness = (drift(6) + .5 * drift(30))[:size]
        waver = 1 + rough * unevenness * (.2 if round(order) == 2 else 1)
        out[:size] += from_db(db) * waver * np.cos(round(order) * angle + rng.uniform(0, 2 * np.pi))
    return from_db(level_db) * np.sqrt(2) * out


def hum(rings):
    """Engine vibration keeps a few narrow resonances sounding."""
    shake = rng.standard_normal(N)
    out = np.zeros(N)
    for hz, width_hz, db in rings:
        out += from_db(db) * rms_one(resonate(resonate(shake, hz, width_hz), hz, width_hz))
    return out


def lull():
    """Gain that makes the low rumble and drone drop away briefly."""
    # the drop: start_s, end_s, change_db
    dip = (9.26, 9.39, -9)
    start, end, db = dip
    return from_db(db * between(start, end))


def street(x, t60, wall_hz):
    """Scattered dull echoes from the underbody, kerb and fences."""
    t = TIME[:SR]
    echoes = band(rng.standard_normal((2, SR)), [250, wall_hz], "band")
    echoes = echoes * from_db(-60 * t / t60) * (t > .012)
    return signal.fftconvolve(x, echoes / np.sqrt(np.sum(echoes ** 2) / 2), axes=1)[:, :N]


def lead(x, phases):
    """Advance the phase of a signal by a table of pitch_hz, phase_radians."""
    size = next_fast_len(N)
    hz = np.arange(size // 2 + 1) * SR / size
    turn = np.exp(1j * np.interp(hz, *np.transpose(phases)))
    return irfft(rfft(x, size) * turn, size)[:N]


def scene():
    """Mix all sounds; sharp ones echo faintly, and the first pass reaches the left side early."""
    burst_width = 0.76  # left-right spread, 0-1
    lead_s, lead_below_hz = .00043, 2340  # the first pass is off to the left
    pops = bursts()
    hits = burst_width * pops + (1 - burst_width) * pops.mean(axis=0)
    hits = hits + rubber() + judder() + bead_ticks()
    echoes = from_db(-24.5) * street(hits, t60=0.13, wall_hz=3000)
    left, right = hits + beads() + groan() + squelches() + tyre() + thuds() + engines() + echoes
    early = lead(left, [(0, 0), (lead_below_hz, 2 * np.pi * lead_below_hz * lead_s)])
    first_pass = between(-1, PASS_EDGES_S[1])
    return np.array([first_pass * early + (1 - first_pass) * left, right])


def record(dry):
    """The left microphone port shifts the treble's phase, loud peaks are rounded, the top is cut."""
    # lead of the left port over the right: pitch_hz, phase_radians
    port_phase = [(1900, 0), (2900, 0.84), (8100, 0.5), (10150, -3), (11700, -6), (12400, -6),
                  (13700, -11.5), (15400, -12.5)]
    cutoff_hz = 15800
    left, right = dry
    loud = 1.17 * np.tanh(np.array([lead(left, port_phase), right]) / 1.164)
    return signal.sosfilt(signal.ellip(10, .1, 70, cutoff_hz, fs=SR, output="sos"), loud)


dry = scene()
out = record(dry)
dump(out)
```